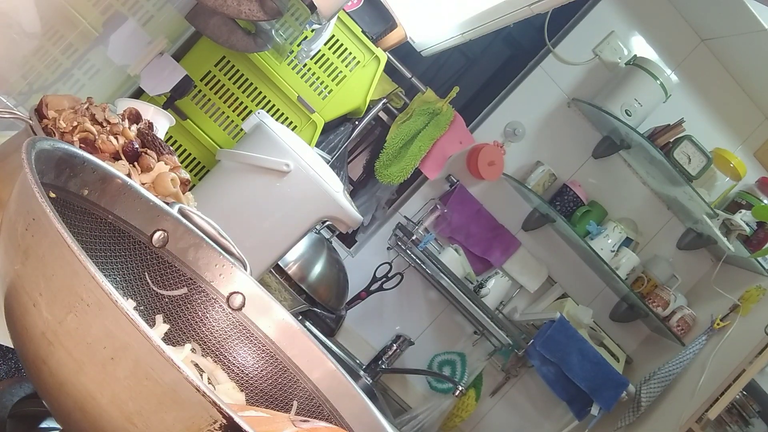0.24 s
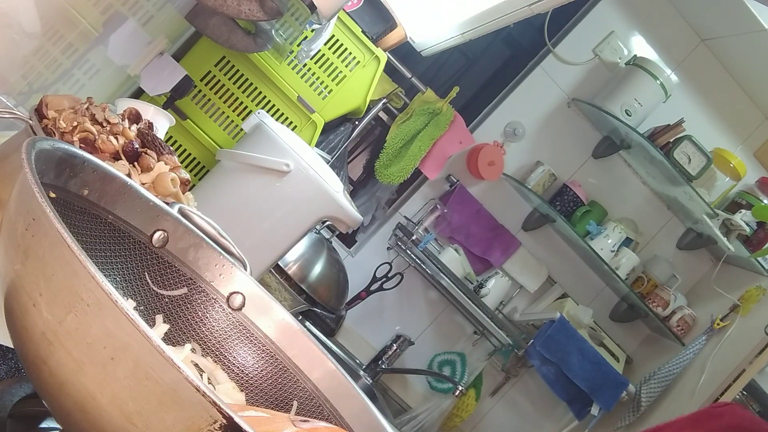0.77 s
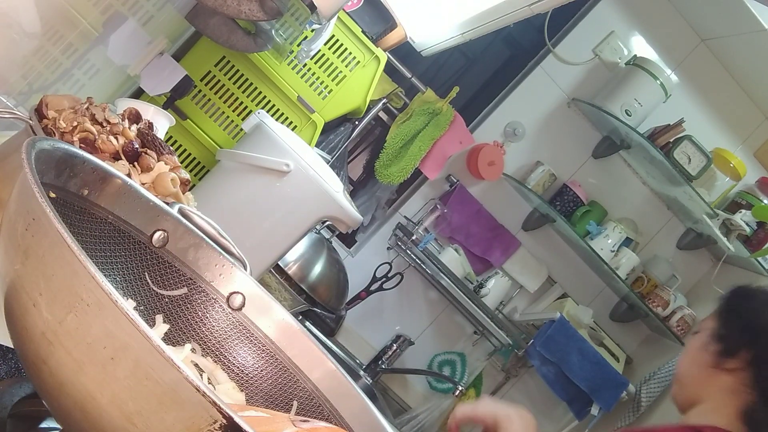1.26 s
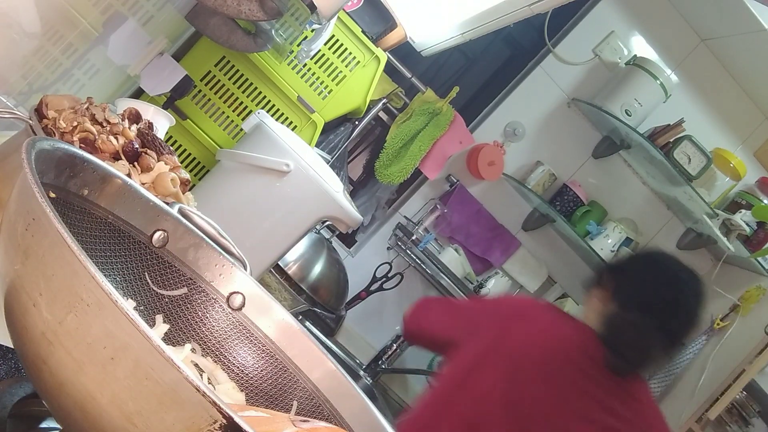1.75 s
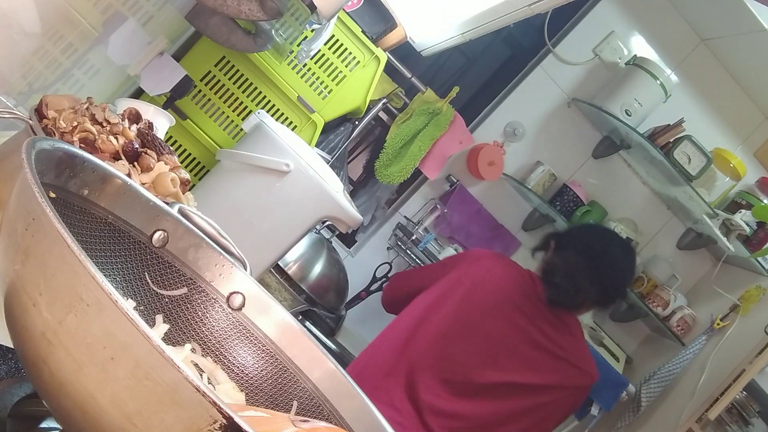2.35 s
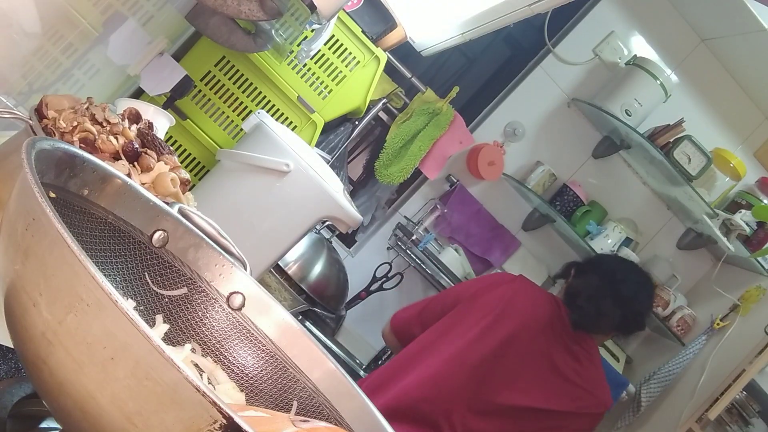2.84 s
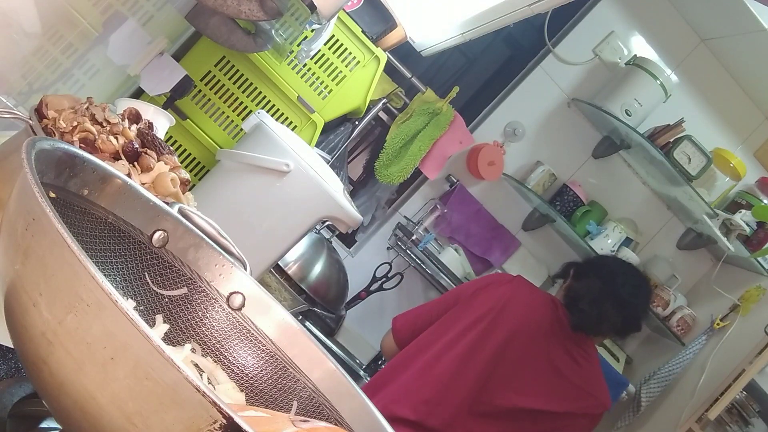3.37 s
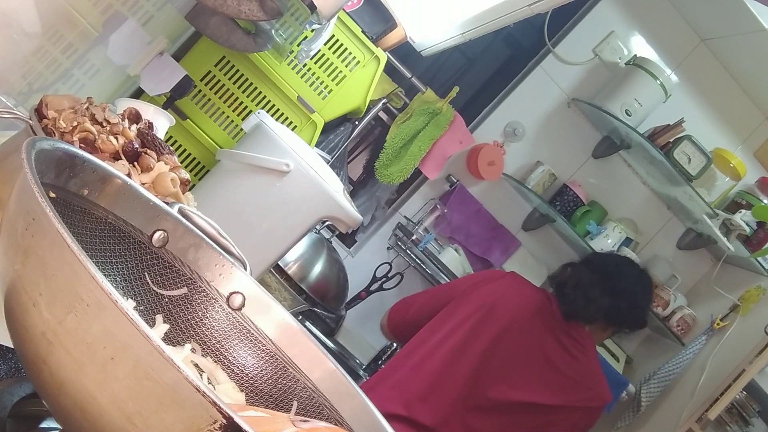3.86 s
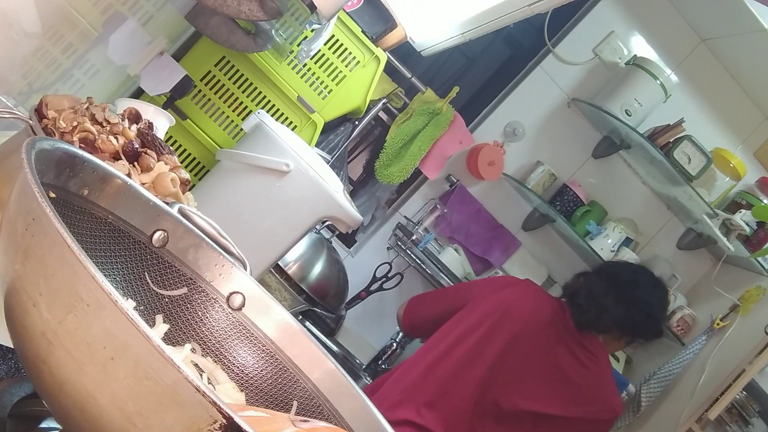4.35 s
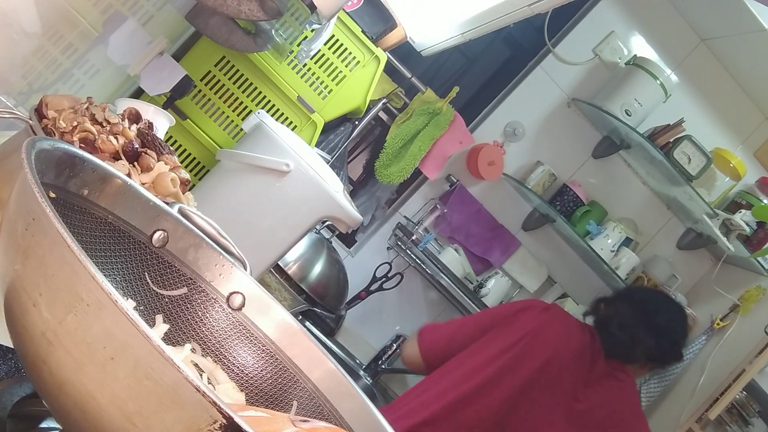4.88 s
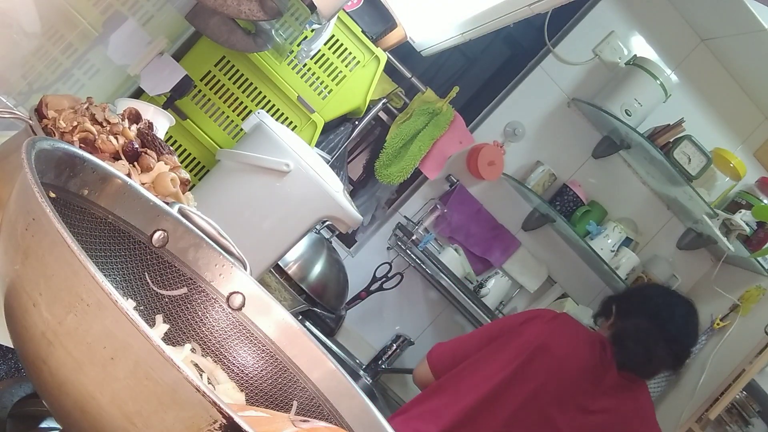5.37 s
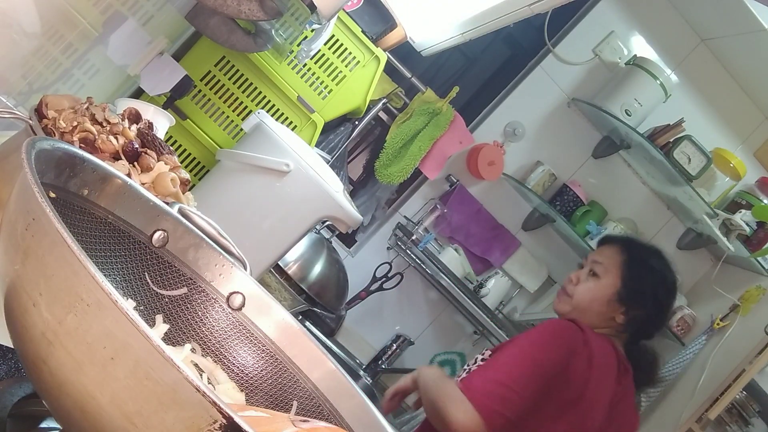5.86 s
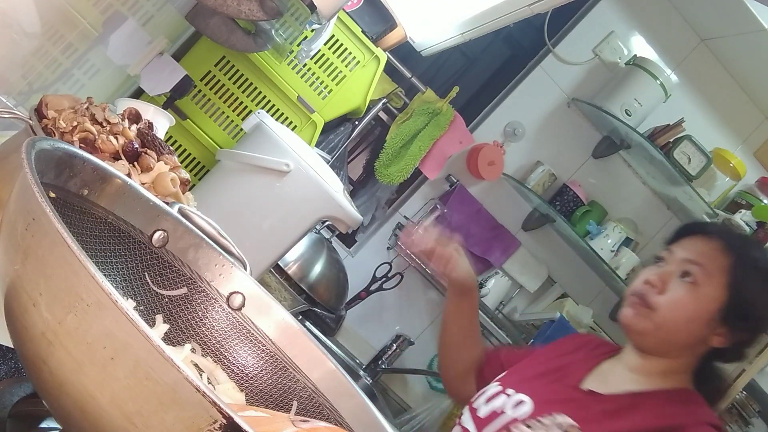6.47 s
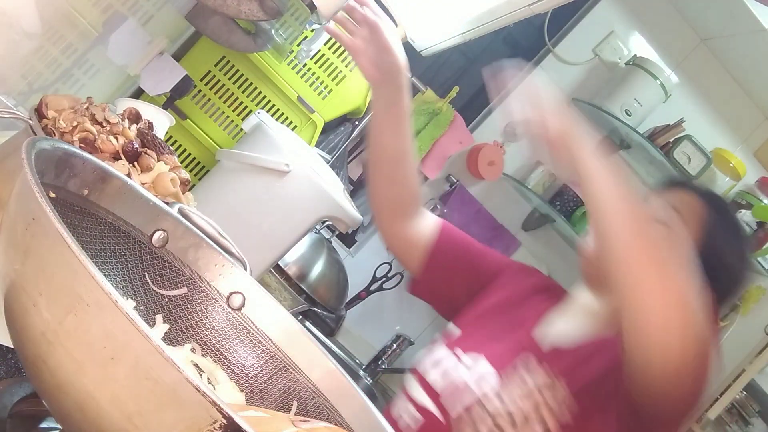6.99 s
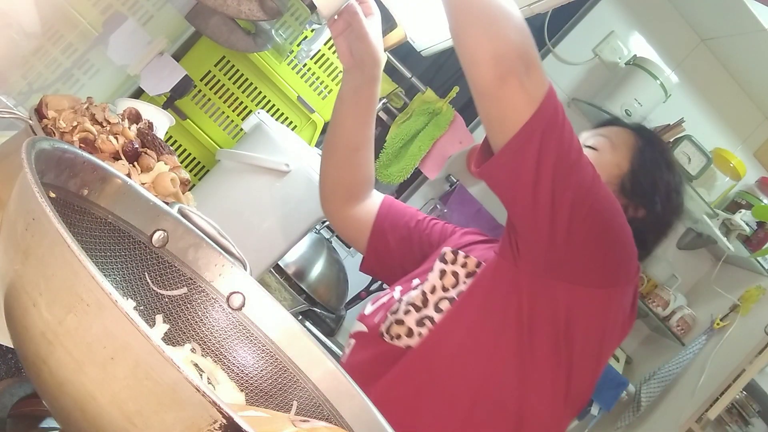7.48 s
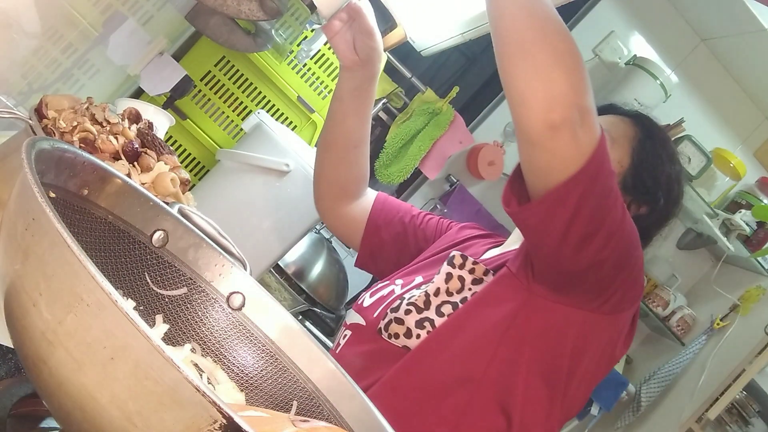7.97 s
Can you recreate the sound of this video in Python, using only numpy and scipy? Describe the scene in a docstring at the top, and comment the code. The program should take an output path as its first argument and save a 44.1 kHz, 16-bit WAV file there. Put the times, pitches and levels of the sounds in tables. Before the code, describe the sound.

A tiled home kitchen, heard from beside the wok: continuous fine sizzling swells slightly once over bassy burner roar. Dull footfalls come early and midway, and barely audible brushing sounds pass on the counter. After seven and a half seconds a loud, hard double crack is followed by a rapid stuttering of low wooden door thuds, then muted taps on a shelf. Stereo, with a resonant, boxy left and a plainer right.

```python
"""Onions sizzling in a wok

Onions sizzle beside a phone: filtered noise mixed with random bubble bursts, over a low noise roar and mains hum.
The cook moves about with soft thuds (short tones and noise) and rustles (noise that swells and fades).
Then a wall cupboard is pulled open: its catch snaps in bright cracks and its door judders in a run of thuds.
The phone's left port sits in a hollow that rings; the right one hears a flatter, fainter kitchen."""
import sys
import numpy as np
from scipy.fft import rfft, irfft, next_fast_len
from scipy.io import wavfile
from scipy.ndimage import map_coordinates

SR = 44100
rng = np.random.default_rng(int(sys.argv[2]) if len(sys.argv) > 2 else 0)


def pcm_store(signal):
    """Save signal as 16-bit PCM."""
    levels = np.round(np.clip(np.atleast_2d(signal), -1, 1) * 32767)
    wavfile.write(sys.argv[1], SR, levels.astype(np.int16).T)


N = 362943
TIME = np.arange(N) / SR  # seconds
SIZE = 2 * next_fast_len(N // 2 + SR // 2)  # filter length in samples, with room for ringing
FREQ = np.fft.rfftfreq(SIZE, 1 / SR)  # Hz
TOP_HZ = 15700  # nothing is kept from here up

# tone of the stove's roar at each port: (frequency [Hz], level [dB])
ROAR_TONE_LEFT = [(15, -19), (40, -27.5), (70, -9), (115, -22), (180, -20.5), (290, -7.5), (345, -22),
                  (420, -53), (520, -49.5), (900, -40.5), (2000, -81)]
ROAR_TONE_RIGHT = [(15, -27), (40, -34), (70, -11.5), (115, -23.5), (180, -25.5), (260, -15.5), (315, -46),
                   (420, -39.5), (600, -32), (1000, -73), (2000, -88)]
# how alike the roar is at the two ports: (frequency [Hz], likeness [0 to 1])
ROAR_LIKENESS = [(100, 1), (200, 1), (290, 0.77), (420, 0), (600, 0.32)]
# tone of the frying at each port: (frequency [Hz], level [dB])
SIZZLE_TONE_LEFT = [(250, -44), (650, -52), (880, -41.5), (1000, -39), (1350, -30.5), (1800, -44),
                    (2600, -31.5), (4500, -35.5), (6000, -34), (7000, -30), (8600, -42.5), (11000, -57.5),
                    (15000, -57.5)]
SIZZLE_TONE_RIGHT = [(250, -60), (700, -38.5), (950, -34.5), (1250, -41), (1700, -37), (2200, -39.5),
                     (4500, -39.5), (7700, -47.5), (10500, -40), (13000, -52.5), (15000, -60)]
# peaks and dips of the surfaces around each port: (frequency [Hz], width [Hz], height [dB])
PORT_PEAKS_LEFT = [(131.8, 7.6, 10), (203.2, 14.3, 7), (237.7, 34.5, 3.5), (261.9, 15.8, 7),
                   (308.7, 17.5, 11.5), (456, 9.8, 2), (575, 19, 8.5), (799, 14, 5), (970, 30, 12.5),
                   (1434, 52.5, 12), (2059, 104, 12.5), (2734, 84, 4), (3100, 51, 2.5), (3215, 155, -6),
                   (3453, 63, -7.5), (3975, 37, 8), (4134, 160, 4.5), (5300, 290, -1.5), (6510, 140, 3.5)]
PORT_PEAKS_RIGHT = [(133.8, 6.8, 5.1), (214, 22, 1.8), (472, 37, 7.7), (777.5, 42, 8.3), (854, 42, 10.7),
                    (1048, 94, 6.3)]
# the cook's feet on the floor: (time [s], level [dB])
FOOTFALLS = [(1.959, -11), (2.038, 1), (4.472, 0), (4.765, -7)]
# tone of the thuds at each port: (frequency [Hz], level [dB])
THUD_TONE_LEFT = [(30, -27), (80, -21), (150, 2), (200, -10), (290, -3.5), (370, -6.5), (520, -51),
                  (900, -45), (1400, -42), (2500, -68), (6000, -110)]
THUD_TONE_RIGHT = [(30, -42), (80, -12), (150, -1.5), (260, -11), (330, -22), (430, -26.5), (550, -23.5),
                   (900, -31), (2500, -42), (6000, -110)]
# tone of the moving floor: (frequency [Hz], level [dB])
FLOOR_TONE = [(10, -28), (30, -10), (55, -6), (100, -7), (170, -9), (250, -18), (500, -66), (1500, -120)]
# things slid on the counter: (time [s], half length [s], level [dB])
SLIDES = [(3.627, 0.053, -50), (4.54, 0.036, -42), (4.8, 0.043, -41.5), (6.073, 0.04, -36),
          (6.15, 0.091, -44)]
# tone of the sliding: (frequency [Hz], level [dB])
SLIDE_TONE = [(200, 6), (550, 4.5), (900, -7), (1900, -13), (2650, 6), (3400, -11), (8000, -28)]
# hard contacts, the catch and then things on the shelf: (time [s], level [dB], brightness [dB per octave])
CONTACTS = [(7.5104, 1, -1.5), (7.745, -16, -14), (8.041, -14, -22), (8.09, -13, -24)]
# tone of the contacts at each port: (frequency [Hz], level [dB])
CONTACT_TONE_LEFT = [(120, -26), (380, -7.5), (600, -26), (900, -24), (1150, -13), (1400, -0.5), (1750, -3),
                     (2050, -10.5), (2450, -1), (3500, -7), (4600, -22), (8000, -23), (15000, -66)]
CONTACT_TONE_RIGHT = [(120, -17), (400, -26), (650, -11), (850, -17), (1400, -10), (2100, -2.5), (2700, -9),
                      (3300, -9), (4500, -27), (8000, -46), (15000, -73)]

# the frying swells once: time, half length, lift
FLARE_S, FLARE_HALF_S, FLARE_DB = 2.9, 0.53, 0.96
# footfalls: pitch of the flexing floor, its boom compared with the blow
FOOT_HZ, FOOT_BOOM_DB = 195.5, 7.5
# each contact: a light touch just before it, a second touch after it
LEAD_S, LEAD_DB = 0.0041, -9
CHATTER_S, CHATTER_DB = 0.00344, -0.5
# then one fall back: delay, level, loss of brightness in dB per octave
REBOUND_S, REBOUND_DB, REBOUND_DULL_DB = 0.036, -7.5, -2
# the door: start of its motion, then middle level, middle pitch and boom of its slips
DOOR_S, DOOR_DB, DOOR_HZ, DOOR_BOOM_DB = 7.589, 6, 280, -6
# the hinge sticks and slips: typical gap, random spread
SLIP_EVERY_S, SLIP_JITTER_S = 0.036, 0.00198
# the pull builds up, holds until this age, then eases
DOOR_RISE_S, DOOR_RISE_DB, DOOR_HOLD_S, DOOR_FADE_DB_PER_S = 0.03, 3.5, 0.19, 114


def amp(db):
    """Turn decibels into a gain."""
    return 10 ** (np.asarray(db) / 20)


def unit(x):
    """Scale to an average strength (rms) of 1."""
    return x / np.sqrt(np.mean(x ** 2) + 1e-20)


def along(points):
    """Join (frequency, value) points into a curve on a log frequency axis."""
    hz, value = np.transpose(points)
    return np.interp(np.log(FREQ + 1), np.log(hz + 1), value)


def wobble(rate):
    """Draw a smooth random curve through `rate` random points a second."""
    points = rng.standard_normal(int(N * rate / SR) + 4)
    return map_coordinates(points, [TIME * rate])


def filtered(x, response):
    """Shape a sound by multiplying its spectrum by a frequency response."""
    return irfft(rfft(x, SIZE) * response, SIZE)[..., :N]


def causal(db):
    """Make a response with these gains that rings only after a blow, never before it."""
    cepstrum = irfft(np.log(amp(db)), SIZE)
    cepstrum[..., 1:SIZE // 2] *= 2
    cepstrum[..., SIZE // 2 + 1:] = 0
    return np.exp(rfft(cepstrum))


def add(track, s, sound):
    """Mix a sound into a track from time s, cut off at the track's end."""
    part = track[..., round(s * SR):][..., :sound.shape[-1]]
    part += sound[..., :part.shape[-1]]


def burst(t60, rise=0.00015, channels=2):
    """Noise that swells (rise [s]) and dies by 60 dB in t60 [s], with energy 1 per channel."""
    t = TIME[:SR // 2]
    envelope = amp(-60 * t / t60) * (1 - np.exp(-t / rise))
    noise = rng.standard_normal((channels, len(t))) * envelope
    return noise / np.linalg.norm(noise, axis=1, keepdims=True)


def stove(roar_db=-2.5, hum_hz=100, hum_db=-43.0, hum_right_db=-3.5):
    """Turbulent roar is filtered noise, alike at both ports in the bass; mains hum is a steady tone."""
    shared, apart = rng.standard_normal((2, N))
    alike = np.clip(along(ROAR_LIKENESS), 0, 1)
    left = filtered(shared, amp(along(ROAR_TONE_LEFT)))
    blend = [alike, np.sqrt(1 - alike ** 2)]  # keeps the power the same
    right = filtered([shared, apart], amp(along(ROAR_TONE_RIGHT)) * blend).sum(axis=0)
    roar = amp(roar_db) * np.array([left, right])
    hum = np.sin(2 * np.pi * hum_hz * TIME + 0.064 * wobble(1.9))  # its phase drifts slightly
    return roar + amp([[hum_db], [hum_db + hum_right_db]]) * hum


def sizzle(level_db=-3.5, burst_rate=5000, size_spread_db=4, steam_share=0.74, seethe_db=0.5,
           tiles_db=-12, tiles_t60=0.081):
    """Thousands of tiny steam bubbles burst in the oil each second and merge into a hiss."""
    bursts = rng.random(N) < burst_rate / SR
    sizes = amp(size_spread_db * np.clip(rng.standard_normal(N), -2, 2))
    # each burst reaches the two ports differently
    crackle = unit(bursts * sizes * rng.standard_normal((2, N)))
    steam = rng.standard_normal((2, N))
    share = np.clip(steam_share, 0, 1)
    fizz = np.sqrt(1 - share) * crackle + np.sqrt(share) * steam
    flare_db = FLARE_DB * np.exp(-((TIME - FLARE_S) / FLARE_HALF_S) ** 2)
    heat = amp(level_db + flare_db + seethe_db * wobble(18))
    # early echoes from the tiles ripple the spectrum
    tiles = 1 + amp(tiles_db) * rfft(burst(tiles_t60, rise=0.0061), SIZE)
    return filtered(heat * fizz, tiles * causal([along(SIZZLE_TONE_LEFT), along(SIZZLE_TONE_RIGHT)]))


def thuds(level_db=22, flex_db=-19.0, flex_time=0.0043, shudder_db=-6, shudder_t60=0.17,
          shudder_rise=0.0087, push_db=-5, boom_db=2.5, boom_right_db=-2):
    """Each footfall or door slip flexes a panel for a few cycles, leaves a shudder and moves the floor."""
    blows, floor = np.zeros((2, N))
    t = TIME[:SR // 2]
    steps = [(s, db, FOOT_HZ, FOOT_BOOM_DB) for s, db in FOOTFALLS]
    for s, db, hz, floor_db in steps + door_slips():
        flex = np.sin(2 * np.pi * hz * t) * t * np.exp(-t / flex_time)
        flex = amp(flex_db) * flex / np.linalg.norm(flex)
        shudder = amp(shudder_db) * burst(shudder_t60, rise=shudder_rise, channels=1)[0]
        push = amp(push_db) * (t == 0)  # one instant push on the floor
        add(blows, s, amp(db) * (shudder + flex))
        add(floor, s, amp(db + floor_db) * (shudder + push))
    wood = filtered(blows, causal([along(THUD_TONE_LEFT), along(THUD_TONE_RIGHT)]))
    boom = amp([[boom_db], [boom_db + boom_right_db]]) * filtered(floor, causal(along(FLOOR_TONE)))
    return amp(level_db) * (wood + boom)


def rustles(rough_db=2, right_db=-3):
    """Sliding friction is noise in brief, uneven swells."""
    stroke = sum(amp(db) * np.exp(-((TIME - s) / length) ** 2) for s, length, db in SLIDES)
    rub = stroke * amp(rough_db * wobble(90)) * rng.standard_normal((2, N))
    return filtered(rub, amp(along(SLIDE_TONE))) * amp([[0], [right_db]])


def clacks(level_db=12.0, crack_t60=0.046, room_t60=0.17, room_db=-1.0, room_dull_db=-3, pivot_hz=1500):
    """Hard contacts chatter and rebound; each touch is a short crack with the kitchen's duller answer."""
    track = np.zeros((2, N))
    # octaves above the pivot, at most two: brightness acts only here
    octaves = np.log2(np.clip(np.fft.rfftfreq(SR // 2, 1 / SR) / pivot_hz, 1, 4))
    touches = [(-LEAD_S, LEAD_DB, 0), (0, 0, 0), (CHATTER_S, CHATTER_DB, 0),
               (REBOUND_S, REBOUND_DB, REBOUND_DULL_DB)]
    for s, db, bright_db in CONTACTS:
        for delay, touch_db, dull_db in touches:
            room = rfft(burst(room_t60, rise=0.0031)) * amp(room_db + room_dull_db * octaves)
            crack = rfft(burst(crack_t60))
            hit = irfft((crack + room) * amp((bright_db + dull_db) * octaves))[:, :SR // 3]
            add(track, s + delay, amp(level_db + db + touch_db) * hit)
    return filtered(track, causal([along(CONTACT_TONE_LEFT), along(CONTACT_TONE_RIGHT)]))


def door_slips(count=10, scatter_db=2.2, pitch_scatter=0.079):
    """The hinge sticks and slips as the door is pulled: rows (time [s], level [dB], pitch [Hz], boom [dB])."""
    late, size, pitch = rng.standard_normal((count, 3)).T
    age = SLIP_EVERY_S * np.arange(count)
    build_db = -DOOR_RISE_DB * np.clip(1 - age / DOOR_RISE_S, 0, 1)
    ease_db = -DOOR_FADE_DB_PER_S * np.maximum(age - DOOR_HOLD_S, 0)
    times = DOOR_S + age + SLIP_JITTER_S * late
    levels = DOOR_DB + build_db + ease_db + scatter_db * size
    pitches = DOOR_HZ * np.exp(pitch_scatter * pitch)
    return list(zip(times, levels, pitches, np.full(count, DOOR_BOOM_DB)))


def scene():
    """Add up everything in the kitchen, as it arrives at the two ports."""
    return stove() + sizzle() + thuds() + rustles() + clacks()


def record(dry):
    """Surfaces around each port boost or weaken certain pitches; the highest treble is removed."""
    colour = [sum(db * np.exp(-2 * ((FREQ - hz) / width) ** 2) for hz, width, db in port)
              for port in (PORT_PEAKS_LEFT, PORT_PEAKS_RIGHT)]
    return filtered(dry, causal(colour) * (FREQ < TOP_HZ))


dry = scene()
out = record(dry)
pcm_store(out)
```